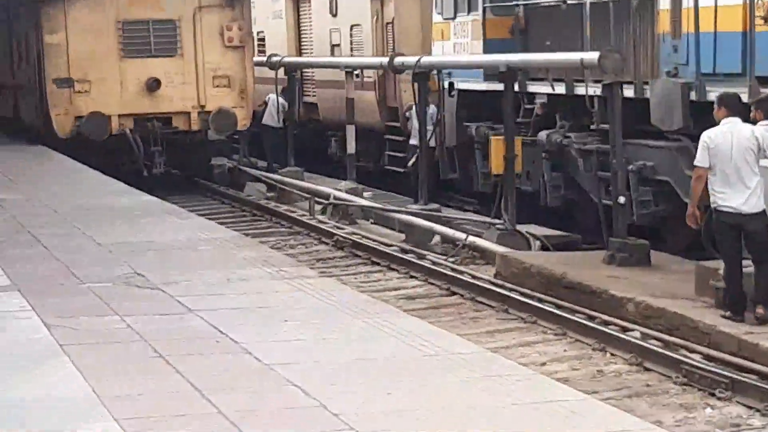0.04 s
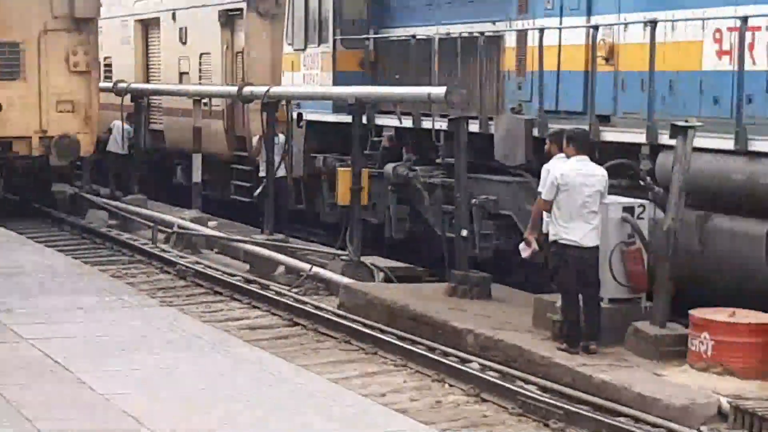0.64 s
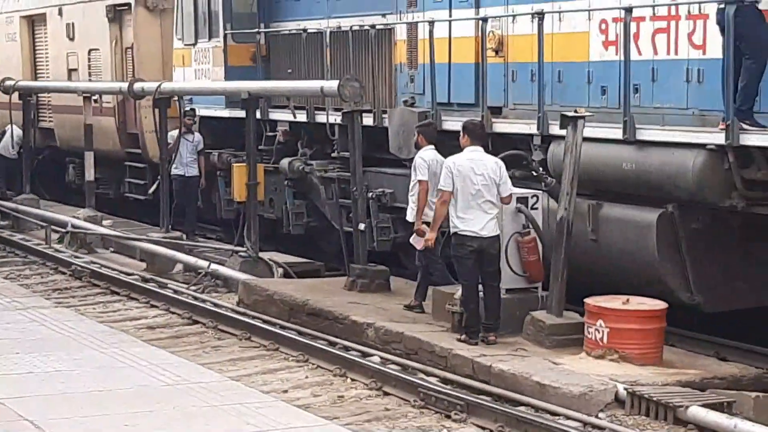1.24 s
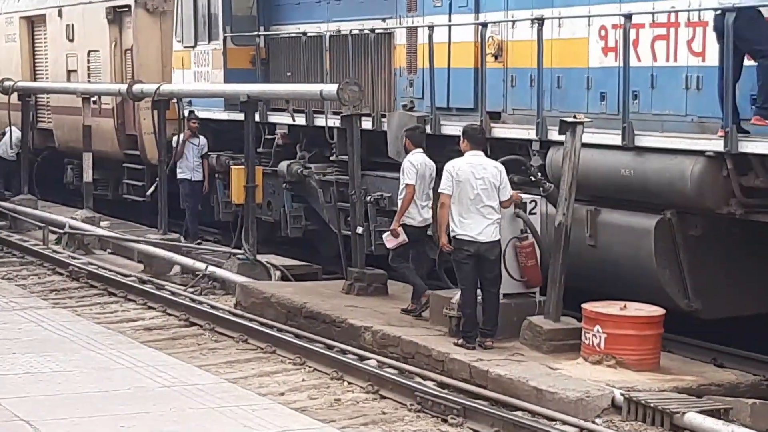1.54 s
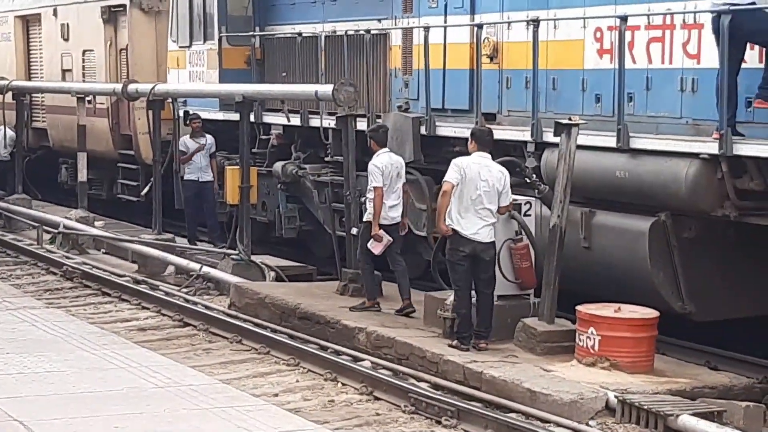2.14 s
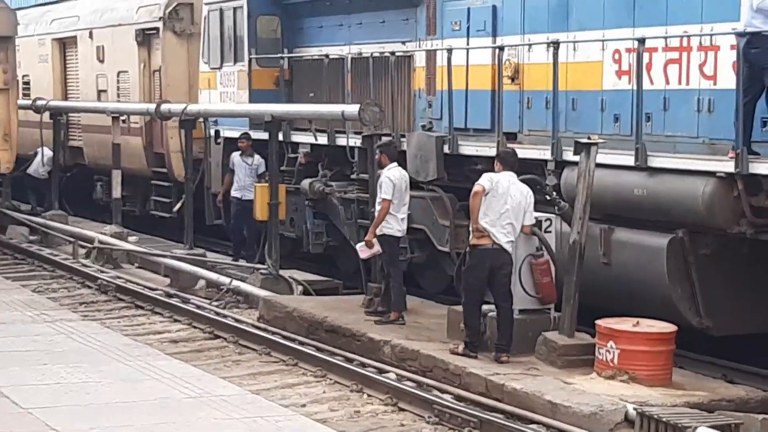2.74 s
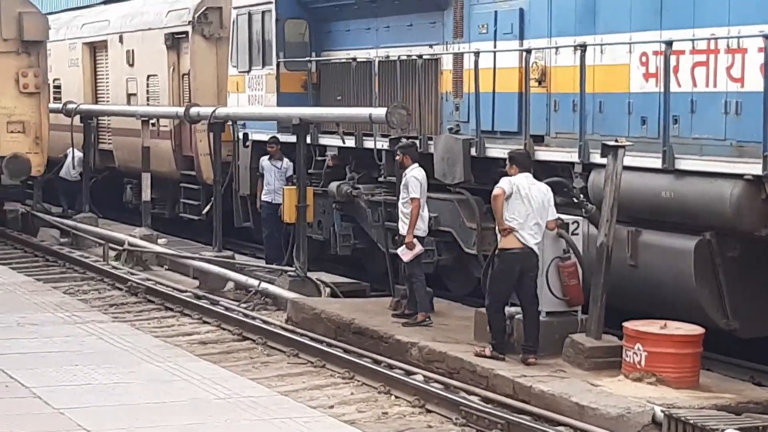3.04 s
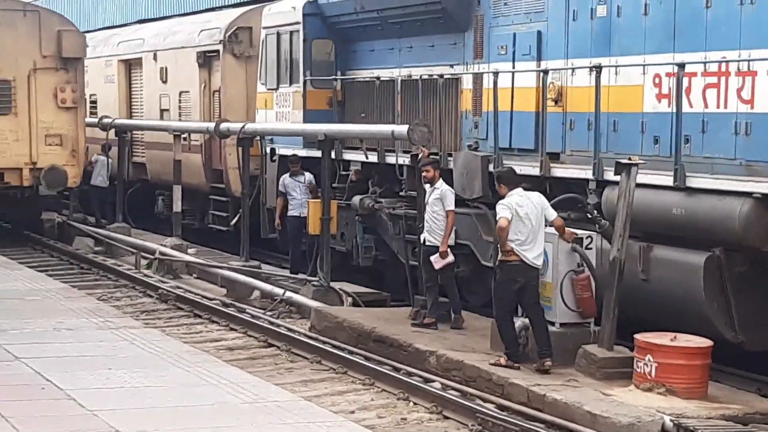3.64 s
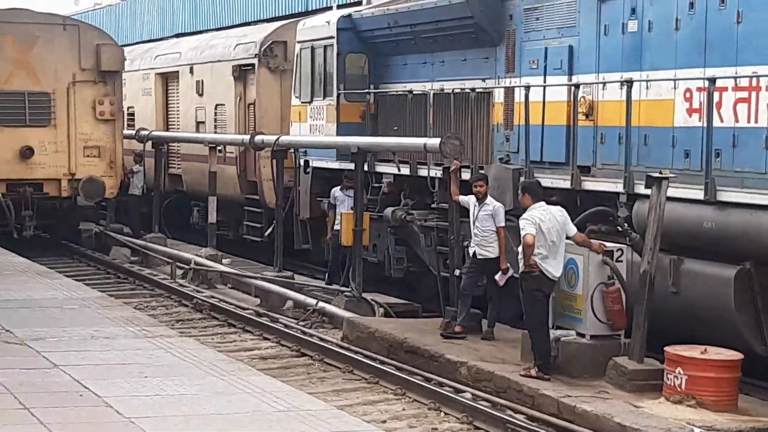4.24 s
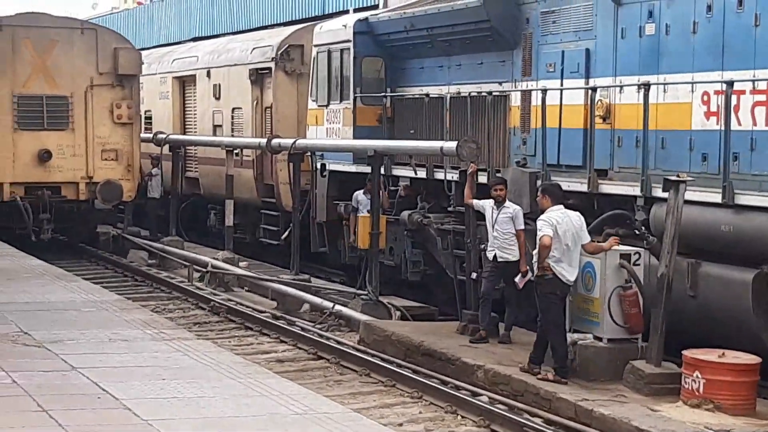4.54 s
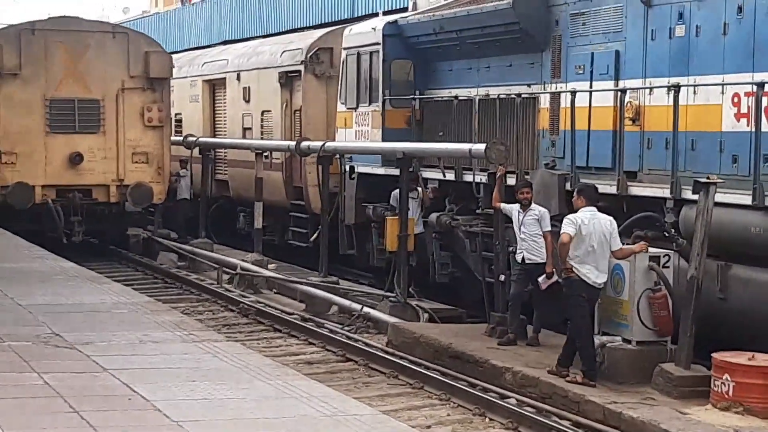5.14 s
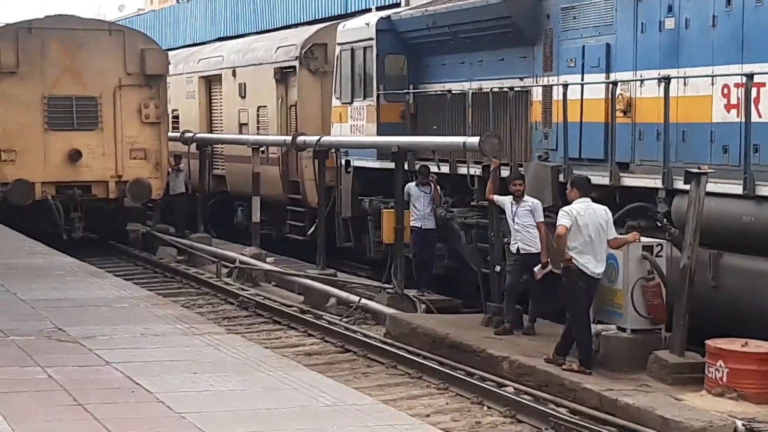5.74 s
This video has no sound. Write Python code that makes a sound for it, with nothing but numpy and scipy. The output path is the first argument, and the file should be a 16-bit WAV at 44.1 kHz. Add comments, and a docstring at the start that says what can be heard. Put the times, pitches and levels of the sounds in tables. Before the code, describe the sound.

A standing diesel locomotive chugs and whines steadily as an air valve lets out a sharp, loud hiss and later two small spits.

```python
"""A sixteen-cylinder two-stroke diesel locomotive idles across the track from a station platform.
Its firings drive a throbbing exhaust, a roar and ringing panels; gears and turbocharger whine, and a
shaft squeaks. All follow the crankshaft, so they drift together as the governor hunts. Compressed air
leaks, escapes in one loud turbulent blast and later spits twice; the phone's gain control ducks under
the blast and creeps back. Light puffs of wind thud on the microphone."""
import sys
import numpy as np
from scipy import signal
from scipy.fft import rfft, irfft, dct, next_fast_len
from scipy.io import wavfile
from scipy.ndimage import uniform_filter1d, minimum_filter1d, map_coordinates

SR = 44100
rng = np.random.default_rng(int(sys.argv[2]) if len(sys.argv) > 2 else 0)


def unload_wav(signal):
    """Save mono or channel-first audio to the path in sys.argv[1] as 16-bit WAV at rate SR, clipped to [-1, 1]."""
    wavfile.write(
        sys.argv[1],
        SR,
        np.round(np.clip(np.atleast_2d(signal).T, -1, 1) * 32767).astype(np.int16),
    )


N = 260187
TIME = np.arange(N) / SR
FREQ = np.arange(N // 2 + 1) * SR / N + 1e-3
IDLE_HZ, EAR_LAG_SAMPLES = 4.4545, 5  # mean crankshaft rate; delay of the left ear
OPENS_S, OPENING_S, SHUTS_S, SEALS_S = 0.7546, 0.004, 1.002, 1.39  # the air system's drain valve

# likeness of the two ears: (frequency [Hz], correlation [0 to 1])
EAR_CORRELATION = [(30, 0.31), (80, 0.63), (160, 0.97), (300, 0.89), (600, 0.95), (1100, 0.63),
                   (2500, 0.021), (6000, 0.028), (15000, 0.038)]
# reverberation of the station: (frequency [Hz], t60 [s])
STATION_DECAY = [(200, 0.58), (2000, 0.85), (5000, 1), (12000, 0.39)]
# the engine as heard from the platform: (time [s], machinery gain [dB], exhaust gain [dB])
ENGINE_GAINS = [(0, -0.5, -0.5), (.7, 0.1, 1.5), (1.3, 2.5, 2), (2.3, 2.35, 3.5), (3.2, 1.26, 2),
                (5.3, 1.6, 0.5), (5.9, 1, 2)]
# exhaust harmonics: (order [cycles per crankshaft turn], relative level [dB])
EXHAUST_ORDERS = [(12, -18), (13, -5.5), (14, -22), (15, -0.5), (16, 3), (17, 0.5), (19, 8.5), (20, -12.5),
                  (23, -4), (24, -2), (25, -10), (28, -11.5), (32, -8), (37, -5), (50, -9.5), (51, -9.5)]
# six exhaust pulses a turn: (position [turns], relative level [dB])
EXHAUST_CHUFFS = [(.02, 2), (.18, -1), (.35, -0.5), (.49, -5.5), (.63, 3), (.75, 1)]
# machinery roar: (frequency [Hz], relative density [dB])
ROAR_SPECTRUM = [(20, -34), (45, 2.5), (75, 2.5), (130, -0.5), (240, -1), (460, -5), (540, -13.5),
                 (1000, -7), (1200, -18.5), (1900, -15), (2300, -15.5), (2650, -13.5), (3200, -20.5),
                 (4300, -20.5), (4900, -23), (7000, -30.5), (11000, -40), (16000, -43.5)]
# hood panel resonances: (frequency [Hz], half-width of each filter stage [Hz], gain [dB])
PANEL_MODES = [(441, 72, -2), (711.6, 99, 1.5), (1500, 207, -7.5), (2075, 226, -6)]
# gear and blower tones: (order [cycles per turn], level [dB], gain at top speed [dB],
# swell once a turn [dB], loudest position [turns], flutter [fraction of pitch])
GEAR_TONES = [(96.94, -42, -4, -2.5, 0.45, 0.01206), (152.3, -40, 4.5, 5, 0.054, 0.0078),
              (162.7, -43, 4.5, 2, 0.41, 0.01206), (164.8, -43.5, -3.5, 1.5, .1, 0.00834),
              (170.8, -47, -3.5, 4, 0.75, .008), (334.5, -44.5, -1, 1.5, 0.45, 0.00656),
              (465, -42, -1.5, 5, 0.8, .014), (568.5, -38.5, -1, 0.5, 0.93, 0.0044),
              (974, -48, 0, 9, 0.72, .016)]
# turbocharger partials: (order [cycles per turn], level [dB])
TURBO_ORDERS = [(885.8, -36), (1771.6, -62), (2657.4, -68.5)]
# the turbocharger's whine swells, fades and shifts between the ears:
# (time [s], gain [dB], left minus right [dB])
TURBO_FADING = [(0, 2, 7), (.15, 1.5, 4), (.35, 5.5, 4.5), (.72, 4.5, 8), (1.35, -3.5, 7.5), (1.45, 6.5, 6),
                (1.52, -1, 2), (1.7, -7.5, 6), (1.82, -3, 6), (2, -5.5, 16), (2.34, -4.5, 2.5),
                (2.62, 4, 8.5), (2.74, 0, -1), (2.98, 0.5, -1.5), (3.1, 4.5, -9.5), (3.22, -1.5, 1),
                (3.34, 4.5, -1), (3.43, -2, -1), (3.55, 1.5, 3), (3.66, 1, -7.5), (3.78, 0, 4),
                (4.05, 1, 0.5), (4.22, -1.5, 12), (4.46, 4.5, -0.5), (4.74, 0, 8), (5.06, 1.5, 5),
                (5.38, 1.2, 12), (5.58, 1.5, -1), (5.7, -3, 8), (5.82, -2.5, -4), (5.9, 2, 8)]
# air leak: (frequency [Hz], relative density [dB])
LEAK_SPECTRUM = [(2000, 8), (5000, 7), (8000, -1), (8750, 12), (9400, 3.5), (11000, -3), (12000, -10),
                 (12750, 4.5), (13600, -2), (15500, -5)]
# rubs of the shaft: (time [s], relative level [dB], left minus right [dB], ear correlation [-1 to 1])
SHAFT_RUBS = [(0.195, -28.5, -1, -0.16), (0.391, -29.5, -6, 0.011), (0.63, -29.5, -3, 0.4),
              (1.299, -29, -5, 0.3), (1.477, -31.5, -8, 0.1), (1.68, -32, -5, -0.1), (1.98, -30, 10, 0.087),
              (2.16, -28, -4, 0.043), (2.377, -32.5, -1, 0.19), (2.617, -31.5, -10, 0.2),
              (2.86, -25.5, 2, -0.26), (3.052, -24.5, -1, 0.86), (3.288, -27.0, 0, 0.5),
              (3.487, -31, 3, 0.94), (3.728, -29.5, 1, 0.7), (3.997, -33.0, 0, 0.2), (4.227, -37, -3, 0.6),
              (4.447, -36, -9, 0.013), (4.808, -29.0, -4, 0.082), (5.065, -27.5, -5, -0.51),
              (5.29, -25.5, -3, -0.95), (5.541, -37, -11, -0.35), (5.745, -31.5, 3, -0.3)]
# air blast: (frequency [Hz], relative density [dB])
BLAST_SPECTRUM = [(200, 1.5), (600, -4.5), (1000, -0.5), (3000, 1.5), (5500, 4.5), (7500, 3.5),
                  (11000, -0.5), (14000, 0.5), (15500, -1)]
# underframe resonances: (frequency [Hz], width [Hz], relative level [dB])
CAVITY_MODES = [(895, 170, -23), (1304, 140, -23.5), (1710, 200, -20.5), (2580, 300, -15.5),
                (3280, 450, -20)]
# puffs of wind: (time [s], relative level [dB], t60 [s], left minus right [dB])
WIND_PUFFS = [(1.5, -18, 0.37, 16), (1.693, -17, 0.12, 24), (1.734, -14.5, 0.047, 25),
              (2.353, -13, 0.085, 25), (2.392, -12.5, 0.16, 26), (2.518, -16, 0.072, 27),
              (2.615, -18.5, 0.17, 20), (3.238, -15.5, 0.075, 25.5), (4.702, -17.5, 0.33, 18),
              (4.761, -22, 0.4, 20), (4.872, -18.5, 0.16, 13), (5.608, -20, 0.13, -16),
              (5.73, -22.5, 0.2, -21)]
# wind rumble before its bass cut: (frequency [Hz], relative density [dB])
RUMBLE_SPECTRUM = [(25, -32), (60, 8), (110, -12.5), (230, 2.5), (450, -12), (1000, -26), (3000, -76)]
# spits of the valve: (time [s], hiss level [dB], t60 [s], whistle frequency [Hz], whistle level [dB])
VALVE_SPITS = [(2.069, -22, 0.1, 12300, -25), (2.1553, -15, 0.082, 11500, -32)]
# hiss of a spit: (frequency [Hz], relative density [dB])
SPIT_SPECTRUM = [(1000, 2), (3000, -4), (6500, -3.5), (10000, -6), (12000, -6), (13500, -13), (15500, -13)]
# lower rush that trails a spit: (frequency [Hz], relative density [dB])
TRAIL_SPECTRUM = [(1500, 0), (4000, -6), (7000, -3), (10000, -20), (15500, -30)]
# notch of the microphone port: (frequency [Hz], gain [dB])
PORT_RESPONSE = [(7300, 0.5), (7900, -7.5), (8400, -19), (9200, -13), (10200, -4.5), (11200, 0.5)]


def undb(db):
    """Amplitude ratio of a level in decibels."""
    return 10 ** (np.asarray(db) / 20)


def level(x, db):
    """Normalisation to an rms level."""
    return x * undb(db) / np.sqrt(np.mean(x ** 2))


def curves(table):
    """Linear interpolation of each column of a timed table, sample by sample."""
    s, *columns = np.transpose(table)
    return [np.interp(TIME, s, column) for column in columns]


def across(points, hz=FREQ):
    """Interpolation of (frequency [Hz], value) points on a logarithmic frequency axis."""
    f, value = np.transpose(points)
    return np.interp(np.log(hz), np.log(f), value)


def colour(x, points):
    """Zero-phase filtering by (frequency [Hz], gain [dB]) points."""
    return irfft(rfft(x) * undb(across(points)), N)


def wander(hz):
    """Random modulation: Gaussian noise of unit rms, low-passed near hz."""
    size = next_fast_len(N)
    lowpass = np.exp(-(np.arange(size // 2 + 1) * SR / size / hz) ** 2)
    return level(irfft(rfft(rng.standard_normal(size)) * lowpass, size)[:N], 0)


def noise():
    """Partial coherence: noise alike at both ears in the low midrange and diffuse in the treble."""
    alike = np.clip(across(EAR_CORRELATION), 0, .99)
    mid, side = rfft(rng.standard_normal((2, N))) * np.sqrt([1 + alike, 1 - alike])
    return irfft(np.array([mid + side, mid - side]), N)


def resonant_noise(hz, width_hz):
    """Resonance selects a narrow band from broadband noise."""
    return irfft(rfft(noise()) / (1 + (2 * (FREQ - hz) / width_hz) ** 2), N)


def release(s, t60):
    """Exponential decay: unity until time s, then 60 dB down every t60 seconds."""
    return np.exp(-np.log(1000) * np.maximum(TIME - s, 0) / t60)


def puff(s, t60, rise_s):
    """A transient envelope: exponential rise and decay from time s."""
    return (1 - np.exp(-np.maximum(TIME - s, 0) / rise_s)) * release(s, t60)


def pan(x, left_db):
    """An interaural level difference places a sound to one side."""
    return x * undb(np.array([[left_db], [-left_db]]) / 2)


def station(x, wet_db):
    """Reverberation: coaches and roof return a diffuse tail whose highest treble dies first."""
    hz, s, cells = signal.stft(rng.standard_normal((2, SR)), SR, nperseg=256)
    decay = np.exp(-np.log(1000) * s / across(STATION_DECAY, hz + 1)[:, None])
    onset = 1 - np.exp(-s / 0.011)
    tail = signal.istft(cells * decay * onset, SR)[1]
    tail /= np.sqrt(np.sum(tail ** 2, axis=1, keepdims=True))
    echo = signal.fftconvolve(x * np.ones((2, 1)), tail, axes=1)[:, :N]
    return (x + undb(wet_db) * echo) / np.hypot(1, undb(wet_db))


def governor(hunt_hz=.041, period_s=3.64, fastest_s=.303):
    """Hunting, a slow oscillation about idle: gives crankshaft turns and the speed's swing (-1 to 1)."""
    swing = np.cos(2 * np.pi * (TIME - fastest_s) / period_s)
    return np.cumsum(IDLE_HZ + hunt_hz * swing) / SR, swing


def exhaust(turns, chuff_turns=0.067, steady=0.6):
    """Periodicity: unequal cylinders repeat every turn, giving harmonics that pulse in limping chuffs."""
    drone, angle = 0, 2 * np.pi * (turns - EXHAUST_CHUFFS[-1][0])
    for order, db in EXHAUST_ORDERS:
        phase = 0.65 * rng.standard_normal() + 0.12 * wander(12.0)
        # reflections off the platform shift each harmonic between the ears
        shift = 0.17 * wander(2.9) * np.array([[1], [-1]])
        drone = drone + undb(db) * np.exp(1j * (order * angle + phase + shift))
    # dividing out the harmonics' beats lets the chuffs set the rhythm
    beats = np.sqrt(uniform_filter1d(np.mean(np.abs(drone) ** 2, axis=0), SR // 25))
    chuffs = sum(undb(db) * np.exp(-(((turns - at + .5) % 1 - .5) / chuff_turns) ** 2)
                 for at, db in EXHAUST_CHUFFS)
    return pan(level(drone.real / beats * (chuffs + steady), -26.0), left_db=0.5)


def clatter(turns, repeating=.55):
    """Partly periodic noise: a share of its power recurs on every turn of the crankshaft."""
    place = (turns % 1) * SR / IDLE_HZ
    looped = np.array([map_coordinates(ear, [place], order=3) for ear in noise()])
    return np.sqrt(repeating) * looped + np.sqrt(1 - repeating) * noise()


def machinery(turns, cylinders=16):
    """Forced vibration: each firing pushes a puff of roar and drives the modes of the hood panels."""
    firing = cylinders * turns
    strength = undb(4.4 * rng.standard_normal(cylinders))[firing.astype(int) % cylinders]
    puffs = 1 + 0.5 * strength * np.exp(-(firing % 1) / 1.7)
    roar = colour(noise() * puffs * undb(0.16 * wander(49)), ROAR_SPECTRUM)
    modes = sum(undb(db) / (1 + 1j * hz / (2 * half_width) * (FREQ / hz - hz / FREQ)) ** 2
                for hz, half_width, db in PANEL_MODES)
    panels = irfft(rfft(clatter(turns) * puffs) * modes, N)
    return pan(level(roar, -27.0) + level(panels, -31.0), left_db=0.2)


def wobble(turns, flutter, ripple=0.0019, fastest_at=0.9):
    """Frequency modulation: the gear train surges once a turn and rattles in its backlash."""
    speed_error = ripple * np.cos(2 * np.pi * (turns - fastest_at)) + flutter * wander(27.4)
    return turns + np.cumsum(speed_error * np.gradient(turns))


def gear_whines(turns, swing):
    """Gears and blower sound at shaft orders, which slide in and out of the hood's resonances."""
    tones = 0
    for order, db, fast_db, swell_db, loudest_at, flutter in GEAR_TONES:
        tone = np.sin(2 * np.pi * order * wobble(turns, flutter))
        turn_db = swell_db * np.cos(2 * np.pi * (turns - loudest_at))
        swell = undb(fast_db * swing + turn_db + 0.9 * wander(10.4))
        tones = tones + level(station(tone, wet_db=-1.0) * swell, db)
    return tones


def turbocharger(turns, swell_db=1.0):
    """Modulation: the gear-driven turbocharger's three harmonics flutter, rise and swell once a turn."""
    shaft = wobble(turns, flutter=0.0026, ripple=0.003, fastest_at=0.837)
    tone = sum(level(np.sin(2 * np.pi * order * shaft), db) for order, db in TURBO_ORDERS)
    swell = undb(swell_db * np.cos(2 * np.pi * turns) + 1.4 * wander(40))
    heard_db, left_db = curves(TURBO_FADING)
    return station(tone * swell, wet_db=-6.5) * undb(heard_db + np.array([left_db, -left_db]) / 2)


def beamed_air(spectrum, bounce_s=0.001282, bounce_db=-14):
    """Directivity sends jet hiss right and the rush left; an underframe reflection comb-filters both."""
    left_db = across([(2400, 4.0), (4400, 1.0), (6500, -5.0), (12000, 0.5), (14000, -5.0)])
    comb = 1 + undb(bounce_db) * np.exp(-2j * np.pi * FREQ * bounce_s)
    return irfft(rfft(noise()) * comb * undb(across(spectrum) + np.array([left_db, -left_db]) / 2), N)


def air_leak():
    """Jet noise: a thin leak hisses until the valve has opened."""
    return level(beamed_air(LEAK_SPECTRUM), -35) * (TIME < OPENS_S + OPENING_S)


def shaft_squeaks(turns, order=485.2, rub_s=0.031):
    """Friction: a shaft rubs about once a turn, at a pitch proportional to the engine's speed."""
    rubs = sum(pan(undb(db) * np.exp(-((TIME - s) / rub_s) ** 2), left_db)
               for s, db, left_db, _ in SHAFT_RUBS)
    angle = 2 * np.pi * order * wobble(turns, flutter=0.00402, ripple=0.0024)
    # reflections pull the two ears in and out of step
    _, _, correlation = curves(SHAFT_RUBS)
    lag_phase = 2 * np.pi * order * IDLE_HZ * EAR_LAG_SAMPLES / SR
    apart = np.arccos(correlation) - lag_phase
    return station(rubs * level(np.sin([angle - apart, angle]), -1.0), wet_db=-8)


def valve_flow(sag_db=12, flare_db=5.5, flare_s=0.032, dribble_db=-37):
    """Discharge: the blast sags as pressure drains, flares as the gap narrows, and leaves a dribble."""
    age = np.maximum(TIME - OPENS_S, 0)
    drained = np.minimum(age / (SHUTS_S - OPENS_S), 1)
    flare = np.exp(-((TIME - SHUTS_S) / flare_s) ** 2)
    blast = undb(flare_db * flare - sag_db * drained ** 2) * release(SHUTS_S, t60=0.39)
    dribble = undb(dribble_db) * release(SEALS_S, t60=.12)
    return np.minimum(age / OPENING_S, 1) * (blast + dribble)


def cavities(flicker_db=5, pitch_drift=.03):
    """Cavity resonance: hollows of the underframe flare and slide in the turbulent jet."""
    out = 0
    for hz, width, db in CAVITY_MODES:
        ring = resonant_noise(hz, width)
        place = np.arange(N) + np.cumsum(pitch_drift * wander(12))
        ring = np.array([map_coordinates(ear, [place], order=1, mode="mirror") for ear in ring])
        out = out + level(ring * undb(flicker_db * wander(19)), db)
    return out


def air_blast(build_s=0.042):
    """Turbulence: air dumped through the valve radiates broadband noise and excites the cavities."""
    flow = level(beamed_air(BLAST_SPECTRUM), 0) + cavities()
    # the rush is partly cancelled at first and builds as the valve opens wide
    rush = colour(flow, [(1500, 1), (4000, 2.5), (10000, -1)])
    narrowness = np.exp(-np.maximum(TIME - OPENS_S, 0) / build_s)
    jet = (flow - rush * narrowness) * valve_flow() * undb(0.5 * wander(60))
    return station(jet, wet_db=-7.0)


def wind_thuds(boom_hz=110):
    """Pressure transients: each puff on a microphone port is a damped boom inside a rumble."""
    rumble, out = level(colour(noise(), RUMBLE_SPECTRUM), -3), 0
    for s, db, t60, left_db in WIND_PUFFS:
        boom = np.sin(2 * np.pi * boom_hz * (TIME - s))
        out = out + pan((boom + rumble) * puff(s, t60, rise_s=0.00062), left_db) * undb(db)
    return colour(out, [(25, -22), (60, -5.0)])


def valve_spits(whistle_width_hz=1300):
    """Transient jets: each spit hisses, whistles in the narrow valve seat and trails a lower rush."""
    hiss = level(colour(noise(), SPIT_SPECTRUM), 0)
    trail = level(colour(noise(), TRAIL_SPECTRUM), -10)
    out = 0
    for s, db, t60, whistle_hz, whistle_db in VALVE_SPITS:
        whistle = level(resonant_noise(whistle_hz, whistle_width_hz), whistle_db)
        out = out + (hiss * undb(db) + whistle) * puff(s, t60, rise_s=0.0011)
        out = out + trail * undb(db) * puff(s, t60=0.36, rise_s=0.0085)
    return station(out, wet_db=-12)


def scene():
    """Superposition with an interaural delay: the locomotive is to the right, so the left ear lags."""
    turns, swing = governor()
    machinery_db, exhaust_db = curves(ENGINE_GAINS)
    engine = machinery(turns) + gear_whines(turns, swing) + shaft_squeaks(turns) + turbocharger(turns)
    engine = engine * undb(machinery_db) + exhaust(turns) * undb(exhaust_db)
    left, right = engine + air_leak() + air_blast() + valve_spits()
    late_left = np.interp(TIME - EAR_LAG_SAMPLES / SR, TIME, left)
    return np.array([late_left, right]) + wind_thuds()


def gain_control(x, limit_db=-14.5, hold_s=1.162, release_s=0.43, window_s=0.066, ahead_s=0.0075):
    """Limiting: gain falls just before the level above the bass passes the limit, holds and recovers."""
    sensed = signal.sosfilt(signal.butter(2, 400, "high", fs=SR, output="sos"), x)
    power = uniform_filter1d(np.mean(sensed ** 2, axis=0), int(window_s * SR))
    power = np.interp(TIME + ahead_s, TIME, power)
    cut_db = np.minimum(limit_db - 10 * np.log10(np.maximum(power, 1e-12)), 0)
    half = int(hold_s * SR / 2)
    held_db = minimum_filter1d(cut_db, 2 * half + 1, origin=half, mode="constant")
    step = 1 / (release_s * SR)
    recovering_db = signal.lfilter([step], [1, step - 1], held_db)
    return x * undb(np.minimum(held_db, recovering_db))


def record(dry):
    """The phone's transfer chain: a notch from its microphone port, gain control and a steep low-pass."""
    port = undb(across(PORT_RESPONSE, np.linspace(1, SR / 2, N)))
    notched = dct(dct(dry, norm="ortho") * port, type=3, norm="ortho")
    lowpass = signal.ellip(10, .2, 80, 15800, fs=SR, output="sos")
    return signal.sosfilt(lowpass, gain_control(notched))


dry = scene()
out = record(dry)
unload_wav(out)
```